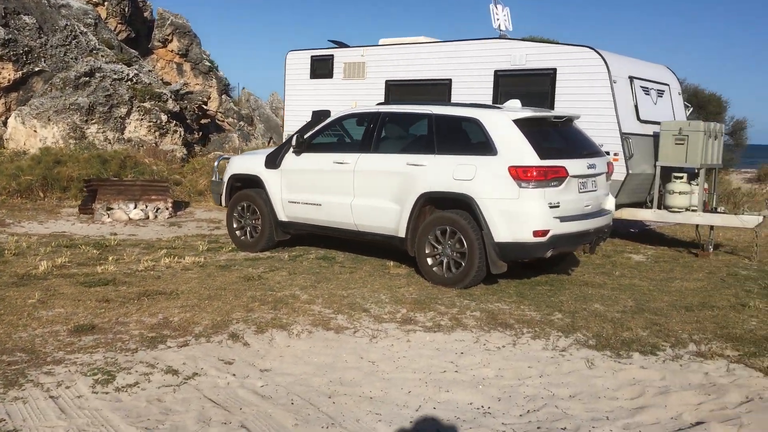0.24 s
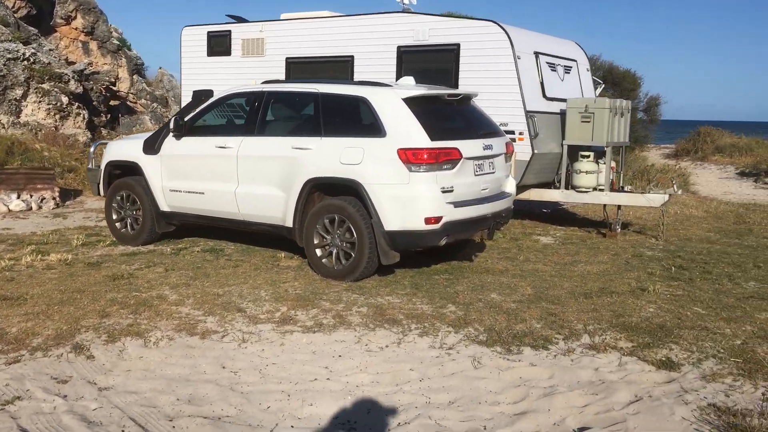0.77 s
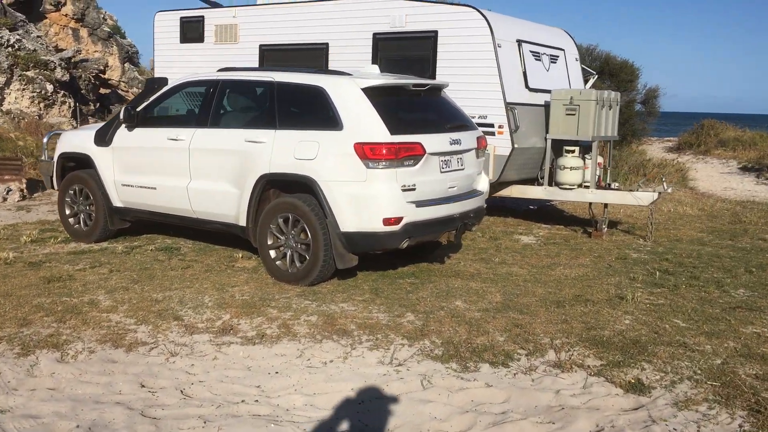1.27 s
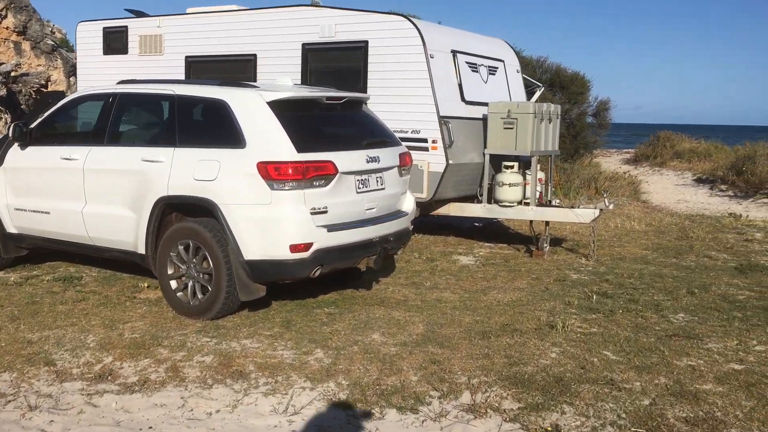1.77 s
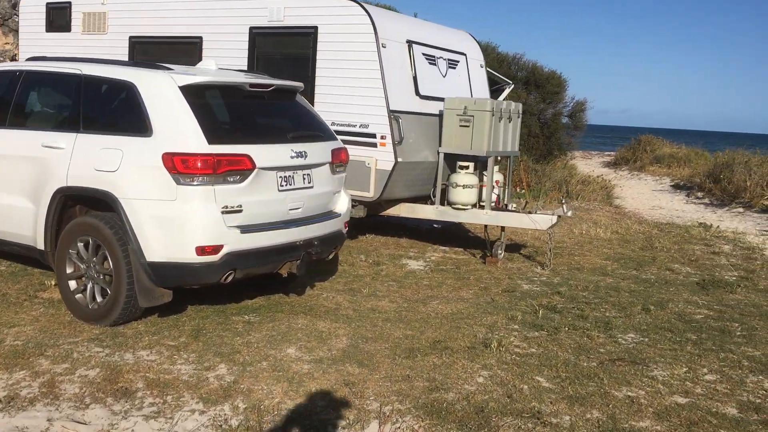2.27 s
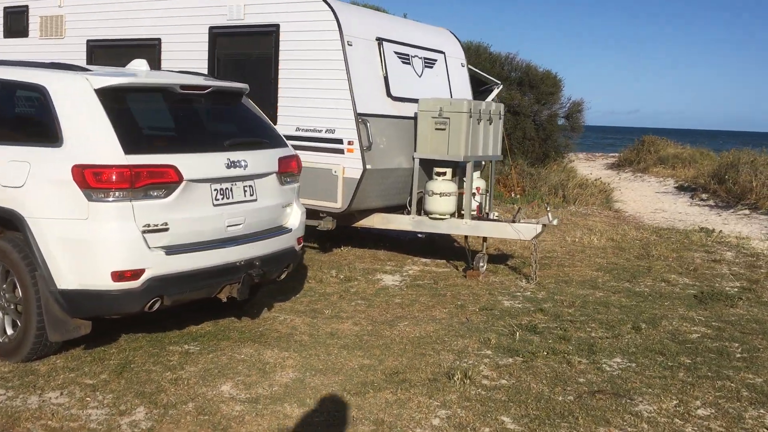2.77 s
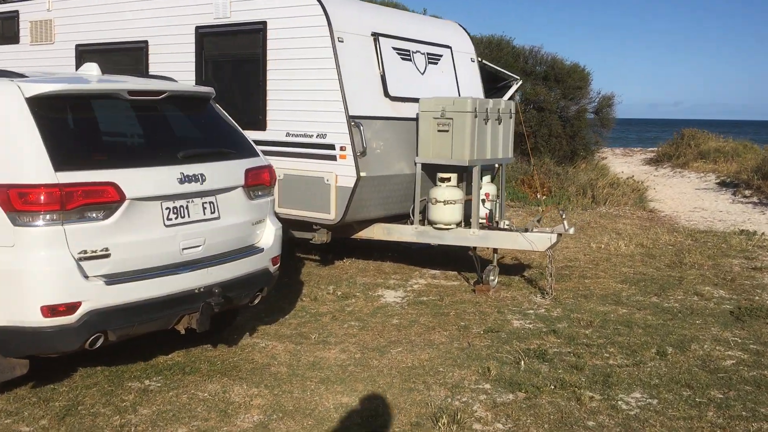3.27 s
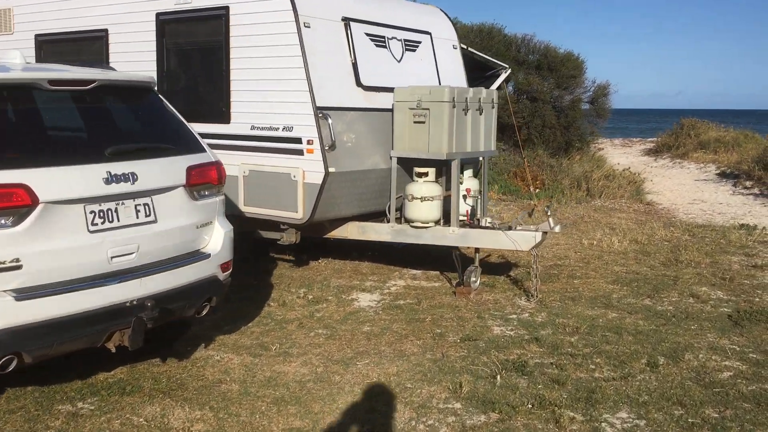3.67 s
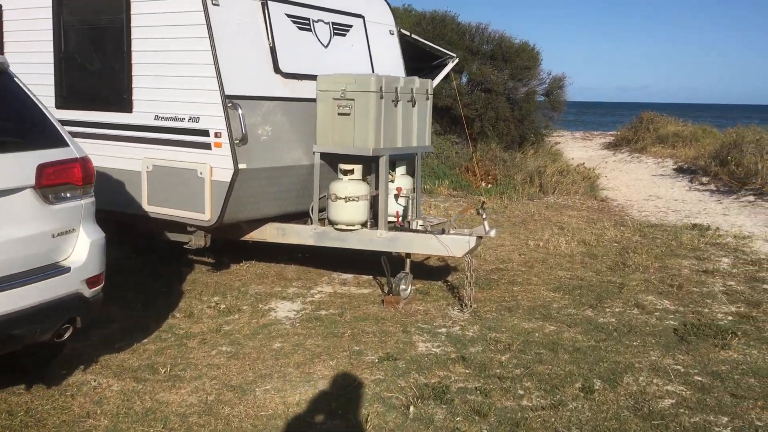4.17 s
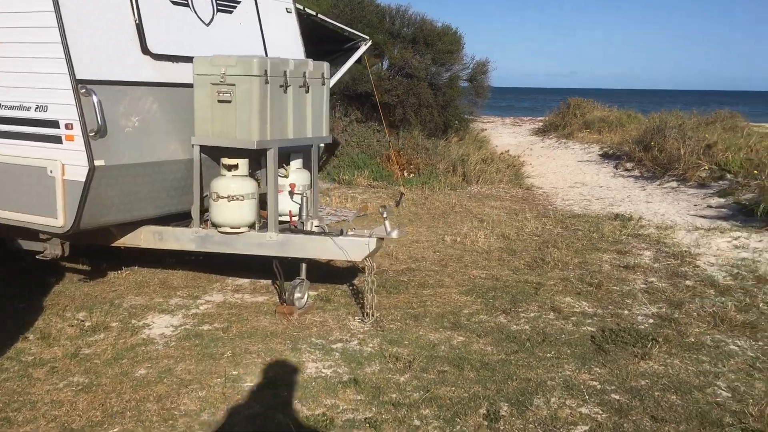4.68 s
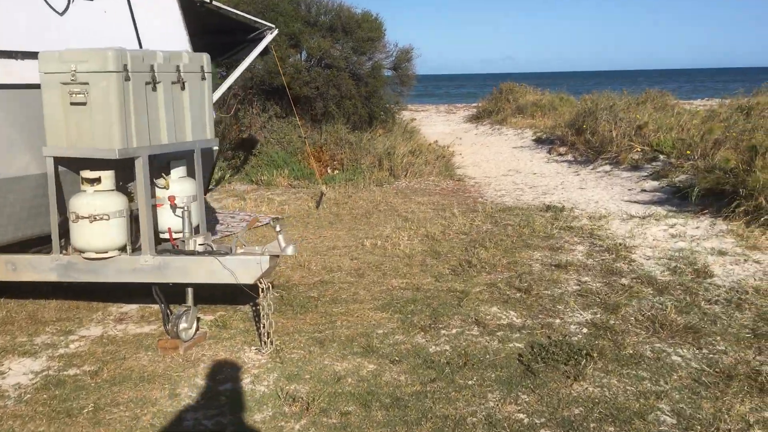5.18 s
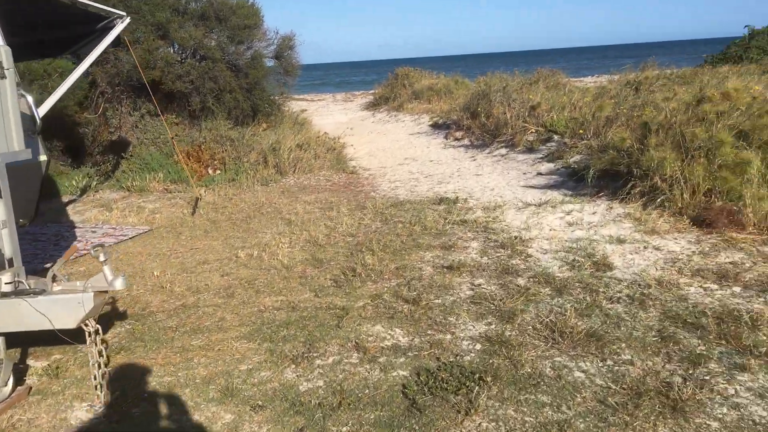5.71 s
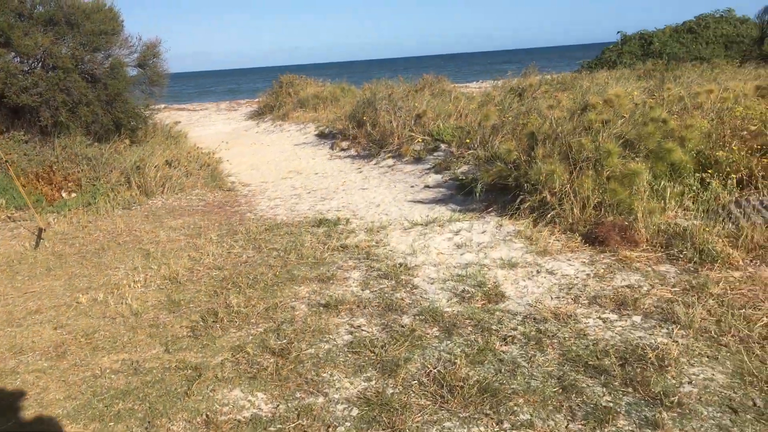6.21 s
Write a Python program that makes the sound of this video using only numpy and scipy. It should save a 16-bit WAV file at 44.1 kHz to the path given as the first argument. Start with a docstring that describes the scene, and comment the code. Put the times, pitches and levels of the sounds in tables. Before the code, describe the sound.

Slow footsteps crunch sand and snap dry stalks, growing clearer as heavy wind buffeting dies down; distant surf washes and a small bird calls faintly.

```python
"""On sandy ground with dry grass near a beach, someone walks at a little under two steps a second.
Soles crunch the sand as clicking grains, brush the grass and snap dry stalks, which ring briefly.
Filtered noise forms the waves that swell and fade on the shore beyond; a small bird buzzes and chirps.
Gusts, as lumpy low noise, rumble on the microphone, hardest at the start, and die down
as the steps grow louder."""
import sys
import numpy as np
from scipy import signal
from scipy.fft import rfft, irfft, next_fast_len
from scipy.io import wavfile
from scipy.ndimage import uniform_filter1d

SR = 44100
rng = np.random.default_rng(int(sys.argv[2]) if len(sys.argv) > 2 else 0)


def file_out(sig):
    """Save sig as 16-bit WAV at sys.argv[1]."""
    # one column per channel
    cols = np.atleast_2d(sig).T
    # limit, then scale
    lim = np.clip(cols, -1, 1)
    pcm = np.round(lim * 32767).astype(np.int16)
    wavfile.write(sys.argv[1], SR, pcm)


N = 284445
TIME = np.arange(N) / SR   # seconds

# Spectra, of which only the shape counts. Each row: frequency in Hz, relative density in dB per Hz.
SHORE_SPECTRUM = [(25, -5.5), (60, 14), (130, 6), (250, 4), (500, -2.5), (1100, -4), (1700, -3),
                  (2600, -11), (4200, -14.5), (5100, -18.5), (8700, -19.5), (10300, -24), (13000, -26),
                  (15700, -31)]      # steady wash of the far shore
SURF_SPECTRUM = [(100, 3.5), (400, -6.5), (700, 1.5), (1100, 3.5), (1750, -2), (2400, -11), (4200, -12.5),
                 (5100, -18.5), (6800, -18.5), (8700, -24.5), (10300, -29), (13000, -35), (15700, -25)]        # breaking waves and backwash
RUMBLE_SPECTRUM = [(15, -28), (26, -24.5), (38, -3), (54, 2.5), (80, -1.5), (120, -7.5), (180, -22),
                   (300, -31), (600, -91)]    # large eddies of the wind
FLUTTER_SPECTRUM = [(80, -22), (140, 8.5), (200, 0), (280, -5), (400, -13), (600, -35), (1000, -36.5),
                    (2000, -60)]  # small eddies of the wind
SWIRL_SPECTRUM = [(150, -16), (330, 6), (480, -4), (620, -12), (850, -21), (1500, -59)]      # swirl at the front edge of a single eddy
GRASS_SPECTRUM = [(1500, -11.5), (3500, 0), (4400, -3), (5100, -13), (6700, -4.5), (8600, 0), (9500, -1.5),
                  (10200, -8.5), (11500, -10), (13200, -23), (15700, -23)]      # blades along the shoe
SAND_SPECTRUM = [(200, -23), (500, 0), (900, -1.5), (1600, 5), (2500, 3), (3600, -1.5), (4400, -19),
                 (5100, -33), (7000, -38), (12000, -50)]        # grains under the sole

# Waves breaking on the shore. Each row: crest in seconds, build-up width in seconds,
# run-out width in seconds, crest level in dB before the churn, low-pass corner in Hz.
WAVES = [(.6, 0.52, 0.33, -70.5, 1670), (3.2, 1.41, 0.31, -62.5, 13100)]
SHORE_DB, BACKWASH_DB = -68, -77.5   # backwash level before the churn

# The breeze between the gusts. Each row: time in seconds, rumble in dB, flutter in dB,
# both before the wind trim.
BREEZE = [(0, -49, -56), (1.3, -59.5, -75), (2.2, -62, -72), (3.25, -51.5, -64.5), (4.1, -60.5, -90),
          (4.88, -80, -86), (4.98, -60, -71), (5.4, -68, -75), (6.45, -62, -69)]
# Gusts on the microphone. Each row: start in seconds, length in seconds, rumble in dB, flutter in dB,
# both before the wind trim.
GUSTS = [(0, .45, -40.5, -54), (0.158, 0.23, -45, -46.5), (0.542, 0.32, -44.5, -60.5),
         (0.901, 0.098, -39.5, -53.5), (1.055, 0.11, -37.5, -61), (1.505, .29, -40, -56.5),
         (1.862, 0.067, -44.5, -63), (1.963, 0.13, -53.5, -66), (2.274, .06, -48, -61.5),
         (2.484, 0.11, -47.5, -65.5), (2.665, 0.28, -52, -62), (3.024, .11, -40.5, -54),
         (3.391, 0.26, -44.5, -68.5), (3.7, 0.31, -55, -83), (4.177, 0.3, -51.5, -76.5),
         (4.581, 0.097, -48, -73), (5.682, 0.27, -54, -73), (6.05, 0.44, -55.5, -69.5)]
GUST_ATTACK_S, GUST_RELEASE_S = 0.015, 0.03
# Single eddies hitting the port. Each row: centre in seconds, envelope peak in dB,
# nominal pitch in Hz, peak level of the swirl in dB.
EDDIES = [(.086, -22.5, 69.4, -49.5), (0.19, -36.5, 160, -49.5), (.273, -34.5, 170, -54),
          (0.371, -34.5, 190, -50.5), (0.674, -30.5, 116.1, -84), (1.171, -41, 129.2, -51),
          (1.712, -36.5, 161.3, -54), (2.317, -36.5, 98.5, -83), (3.291, -28.5, 70, -61),
          (4.341, -41, 198, -50.5)]
EDDY_HALF_S, SWIRL_LEAD_S = 0.0072, 0.0053

# Dry stalks snapping. Each row: time in seconds, level in dB before the snap trim,
# pitch in Hz, treble against the middle in dB.
SNAPS = [(1.0605, -43.5, 2620, -26), (1.631, -50, 1870, -24), (2.4435, -39.5, 2000, -14.5),
         (2.9891, -48, 2260, -7), (3.2792, -48.5, 3240, -18), (3.5249, -51, 1980, -23),
         (3.8112, -46.5, 2100, -19), (4.3746, -53, 2200, -24), (4.781, -50, 1780, -26),
         (4.9199, -47, 2300, -18), (5.4994, -45, 2130, -27), (6.0494, -47, 2020, -20)]
# Packed sand creaking under a sole. Each row: peak in seconds, pitch at the peak in Hz,
# glide in Hz per second, level in dB.
CREAKS = [(4.246, 2185, 4000, -63), (4.64, 2370, -4500, -61.5), (4.837, 2586, 10000, -65.5),
          (5.73, 2220, -15000, -54), (5.761, 2030, 15000, -52.5), (5.776, 2810, 20002.5, -57.5),
          (5.806, 2950, 7000.5, -61)]
CREAK_HALF_S = .0085

# Footfalls rolling from heel to toe. Each row: heel in seconds, roll in seconds, sand crunch in dB,
# grass swish in dB (both before the catching), toe against heel in dB.
STEPS = [(.285, 0.089, -70, -75.5, -5), (.897, .075, -71, -75.5, -14), (1.475, 0.07, -71.5, -77.5, -1),
         (1.84, .04, -78, -79.5, -5), (2.035, .07, -72.5, -74, -4), (2.45, 0.28, -72, -77, 2),
         (2.99, .02, -64, -70.5, -2), (3.043, 0.017, -52.5, -50.5, -3), (3.633, .085, -64.5, -71, -10),
         (4.018, .03, -70, -72, -10), (4.221, 0.037, -68, -71.5, -1.5), (4.626, .125, -65, -71.5, -3),
         (4.785, 0.056, -65.5, -75.5, -2), (5.10, 0.0086, -75, -78, -20), (5.346, 0.049, -66, -71.5, -3.5),
         (5.728, .075, -69.5, -70, 5), (5.848, 0.087, -65.5, -72.5, -4.5), (6.06, 0.057, -69, -84, -8),
         (6.264, 0.035, -69, -72, -9), (6.364, 0.023, -57, -59.5, -0.5)]
CONTACT_RISE_S, CONTACT_FALL_S = .015, 0.017
SOLE_DB, SOLE_RISE, SOLE_FALL = -3.5, 0.58, 0.74   # level against the heel; widths as shares of the roll
TRICKLE_DB, TRICKLE_S = -6, 0.029   # sand falling back after the toe: level against the toe, fall width

CUTOFF_HZ = 15650


def from_db(db):
    """Amplitude gain is ten to the power of a twentieth of the decibels."""
    return 10 ** (np.asarray(db) / 20)


def rms_one(x):
    """Normalisation: dividing by the root mean square gives unit power."""
    return x / np.sqrt(np.mean(x ** 2) + 1e-20)


def in_time(rows):
    """Linear interpolation carries each column of a curve to every sample."""
    s, *columns = np.transpose(rows)
    return [np.interp(TIME, s, column) for column in columns]


def coloured(x, spectrum):
    """Spectral shaping: weighting the Fourier bins of a flat signal colours it; the result has rms 1."""
    size = next_fast_len(N)
    hz, db = np.transpose(spectrum)
    bins = np.maximum(np.arange(size // 2 + 1) * SR / size, 1)
    weights = from_db(np.interp(np.log(bins), np.log(hz), db))
    return rms_one(irfft(rfft(x, size) * weights, size)[:N])


def drift(rate):
    """Slow random modulation: lines joining chance values, rate of them a second, with rms 1."""
    knots = rng.standard_normal(N // 20)
    return rms_one(np.interp(TIME * rate, np.arange(len(knots)), knots))


def swell(s, rise, fall):
    """Gaussian envelope of height 1 around time s, with its own width on each side."""
    away = (TIME - s) / np.where(TIME < s, rise, fall)
    return np.exp(-.5 * np.minimum(away ** 2, 60))


def grains(per_s, spread_db):
    """Shot noise: independent tiny clicks of random sign and very uneven size."""
    sizes_db = spread_db * np.minimum(rng.exponential(1, N), 4)
    sizes = from_db(sizes_db) * rng.choice([-1, 1], N)
    return sizes * (rng.random(N) < per_s / SR)


def resonate(x, hz, width_hz):
    """Resonance: a pair of poles rings at one frequency, with a gain of about 1 at the peak."""
    r = np.exp(-np.pi * width_hz / SR)
    zeros = np.array([1, 0, -1]) * (1 - r * r) / 2
    poles = [1, -2 * r * np.cos(2 * np.pi * hz / SR), r * r]
    return signal.lfilter(zeros, poles, x + 1e-18)


def turbulence(spectrum, lump_s):
    """Turbulent pressure: noise lumpy within lump_s that holds its strength over longer times."""
    noise = coloured(rng.standard_normal(N), spectrum)
    local_power = uniform_filter1d(noise ** 2, max(int(lump_s * SR), 2))
    return noise / np.sqrt(local_power + 0.013)


def sea(churn_db=1.12):
    """Broadband surf: a steady wash, and waves that build, break and run out; a distant one is duller."""
    surf = from_db(BACKWASH_DB) * coloured(rng.standard_normal(N), SURF_SPECTRUM)
    for crest_s, build_s, run_out_s, db, dull_hz in WAVES:
        air = signal.butter(1, dull_hz, fs=SR, output="sos")
        roar = rms_one(signal.sosfilt(air, coloured(rng.standard_normal(N), SURF_SPECTRUM)))
        surf = surf + from_db(db) * swell(crest_s, build_s, run_out_s) * roar
    churn = from_db(churn_db * drift(rate=18))
    shore = from_db(SHORE_DB) * coloured(rng.standard_normal(N), SHORE_SPECTRUM)
    return churn * surf + shore


def far_bird(buzz_db=-77, chirp_db=-76):
    """Bird voice in the scrub: resonant noise makes a thin buzz, later a gliding tone one rising chirp."""
    buzz = resonate(rng.standard_normal(N), hz=4600, width_hz=1100)
    buzz = rms_one(resonate(buzz, hz=4600, width_hz=1300))
    pitch = np.interp(TIME, [1.343, 1.366], [5200, 6300]) + 180 * drift(rate=630)
    chirp = np.sin(2 * np.pi * np.cumsum(pitch) / SR)
    buzzing = from_db(buzz_db) * swell(0.24, 0.093, 0.085) * buzz
    chirping = from_db(chirp_db) * swell(1.355, 0.015, 0.017) * chirp
    return buzzing + chirping


def gust(start, length):
    """Gust envelope: linear attack, hold and exponential release, with height 1."""
    rising = np.clip((TIME - start) / GUST_ATTACK_S + .5, 0, 1)
    return rising * np.exp(-np.maximum(TIME - start - length, 0) / GUST_RELEASE_S)


def wind(unsteady_db=2.5, trim_db=-0.92):
    """Scales of turbulence: large eddies rumble, small ones flutter; gust powers add to a light breeze."""
    rumble_power, flutter_power = from_db(in_time(BREEZE)) ** 2
    for start, length, rumble_db, flutter_db in GUSTS:
        blowing = gust(start, length)
        rumble_power = rumble_power + (from_db(rumble_db) * blowing) ** 2
        flutter_power = flutter_power + (from_db(flutter_db) * blowing) ** 2
    # the flow surges and stalls
    unsteady = from_db(trim_db + unsteady_db * np.minimum(drift(rate=32), 1.3))
    rumble = np.sqrt(rumble_power) * turbulence(RUMBLE_SPECTRUM, lump_s=0.14)
    flutter = np.sqrt(flutter_power) * turbulence(FLUTTER_SPECTRUM, lump_s=0.037)
    return unsteady * (rumble + flutter)


def buffets(wobble=.25):
    """Vortex passage: an eddy swings the port pressure a few times, unevenly, behind a short swirl."""
    travel = np.cumsum(np.exp(wobble * drift(rate=380))) / SR   # time stretched unevenly
    swirl = turbulence(SWIRL_SPECTRUM, lump_s=0.018)
    out = np.zeros(N)
    for s, db, hz, swirl_db in EDDIES:
        swing = np.sin(2 * np.pi * (hz * travel + rng.random()))
        out += from_db(db) * swell(s, EDDY_HALF_S, EDDY_HALF_S) * swing
        out += from_db(swirl_db) * swell(s - SWIRL_LEAD_S, EDDY_HALF_S, EDDY_HALF_S) * swirl
    return out


def snaps(splinter_s=0.0023, splinter_share=0.25, trim_db=-1.5, knock_share=0.53, sharp_share=0.056):
    """Brittle fracture: a crack and milliseconds of splintering excite resonances and a dull knock."""
    out, t = np.zeros(N), TIME[:SR // 20]
    low_pass = signal.butter(4, 4400, fs=SR, output="sos")
    for s, db, hz, treble_db in SNAPS:
        crack = splinter_share * rng.standard_normal(len(t)) * np.exp(-t / splinter_s)
        crack[0] += 1
        body = resonate(crack, hz, width_hz=420) - .5 * resonate(crack, hz=3570, width_hz=560)
        body = body - knock_share * resonate(crack, hz=850, width_hz=630)
        body = signal.sosfilt(low_pass, body + sharp_share * crack)
        edge = resonate(resonate(crack, hz=8600, width_hz=3900), hz=8600, width_hz=3900)
        snap = body / np.abs(body).max() + from_db(treble_db) * edge / np.abs(edge).max()
        at = int((s + 0.000896) * SR)
        out[at:at + len(t)] += from_db(db + trim_db) * snap[:N - at]
    return out


def creaks(width_hz=260):
    """Stick-slip: packed grains slip nearly in step, a rough band whose pitch glides with the load."""
    low_pass = signal.butter(2, width_hz, fs=SR, output="sos")
    slips = signal.sosfilt(low_pass, rng.standard_normal((2, N)))
    out = np.zeros(N)
    for s, hz, glide, db in CREAKS:
        pitch = hz + glide * np.clip(TIME - s, -2 * CREAK_HALF_S, 2 * CREAK_HALF_S)
        phase = 2 * np.pi * np.cumsum(pitch) / SR
        band = rms_one(slips[0] * np.cos(phase) + slips[1] * np.sin(phase))
        out += from_db(db) * swell(s, CREAK_HALF_S, CREAK_HALF_S) * band
    return out


def footfall(heel_s, roll_s, toe_db):
    """Addition of powers: heel lands, sole rolls over, toe pushes off and sand trickles back."""
    toe_s = heel_s + roll_s
    heel = swell(heel_s, CONTACT_RISE_S, CONTACT_FALL_S)
    sole = from_db(SOLE_DB) * swell(heel_s + roll_s / 2, SOLE_RISE * roll_s, SOLE_FALL * roll_s)
    toe = from_db(toe_db) * swell(toe_s, CONTACT_RISE_S, CONTACT_FALL_S)
    trickle = from_db(toe_db + TRICKLE_DB) * swell(toe_s, CONTACT_RISE_S, TRICKLE_S)
    return heel ** 2 + sole ** 2 + toe ** 2 + trickle ** 2


def footsteps(crackle_db=-9.0, patchy_db=3.0):
    """Granular friction: sand grains slip in dense clicks, blades flick along the shoe, dry bits crackle."""
    press, brush = np.zeros(N), np.zeros(N)   # power on the sand and on the grass
    for heel_s, roll_s, crunch_db, swish_db, toe_db in STEPS:
        contact = footfall(heel_s, roll_s, toe_db)
        press += from_db(crunch_db) ** 2 * contact
        brush += from_db(swish_db) ** 2 * contact
    catching = from_db(1.0 * drift(rate=210))   # the sole catches and gives way
    crackle = from_db(crackle_db) * rms_one(grains(per_s=260, spread_db=1.0))
    # clumps give way at their own moments, each ringing briefly at its own pitch
    clumps = np.zeros(N)
    for hz in np.linspace(500, 4700, 10):
        ringing = resonate(grains(per_s=830, spread_db=4.5), hz, width_hz=610)
        clumps += ringing * from_db(patchy_db * drift(rate=110))
    sand = coloured(rms_one(clumps) + crackle, SAND_SPECTRUM)
    blades = rms_one(grains(per_s=7300, spread_db=2.5))
    grass = coloured(blades + crackle, GRASS_SPECTRUM)
    return catching * (np.sqrt(press) * sand + np.sqrt(brush) * grass)


def scene():
    """Superposition: in open air without echoes, all pressures add at one microphone."""
    background = sea() + far_bird() + wind() + buffets()
    walker = snaps() + creaks() + footsteps()
    return (background + walker)[None]


def record(dry, notch_share=0.24):
    """Port resonance hollows a narrow treble band; a 2 ms fade-in, then a steep low-pass cuts the top."""
    heard = dry - notch_share * resonate(dry, hz=4900, width_hz=190)
    fade = np.minimum(TIME / .002, 1)
    # order 12, 0.1 dB passband ripple, 80 dB stopband attenuation
    low_pass = signal.ellip(12, .1, 80, CUTOFF_HZ, fs=SR, output="sos")
    return signal.sosfilt(low_pass, fade * heard)


dry = scene()
out = record(dry)
file_out(out)
```